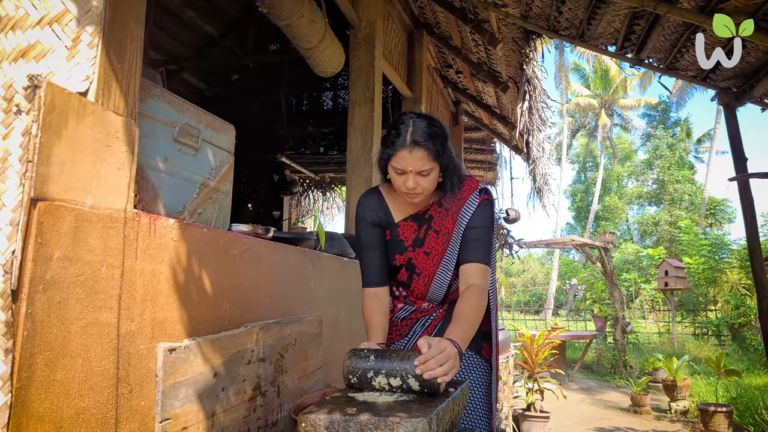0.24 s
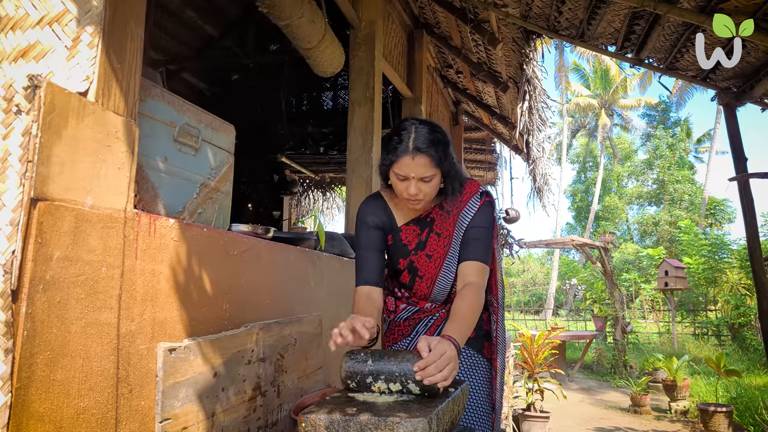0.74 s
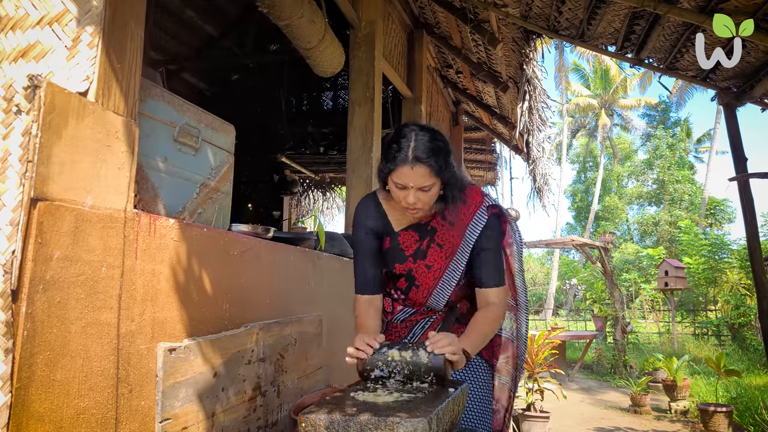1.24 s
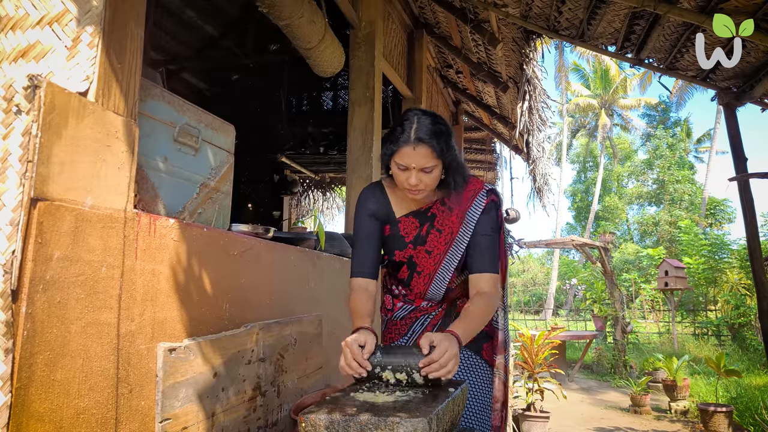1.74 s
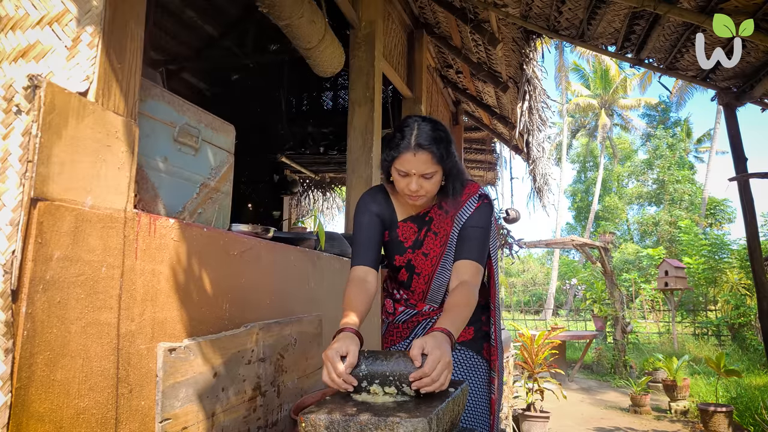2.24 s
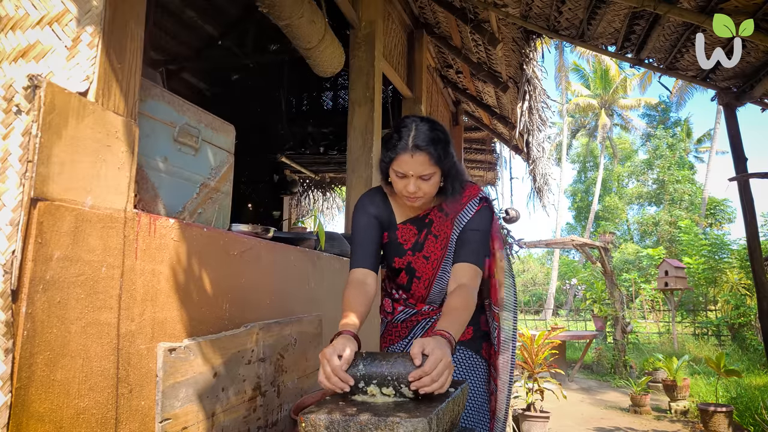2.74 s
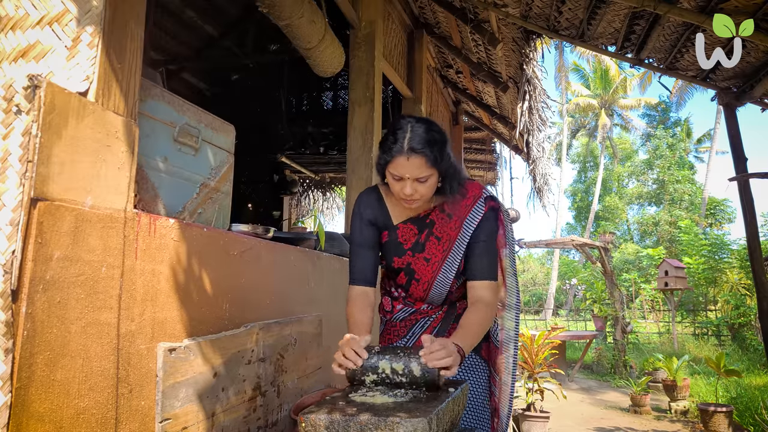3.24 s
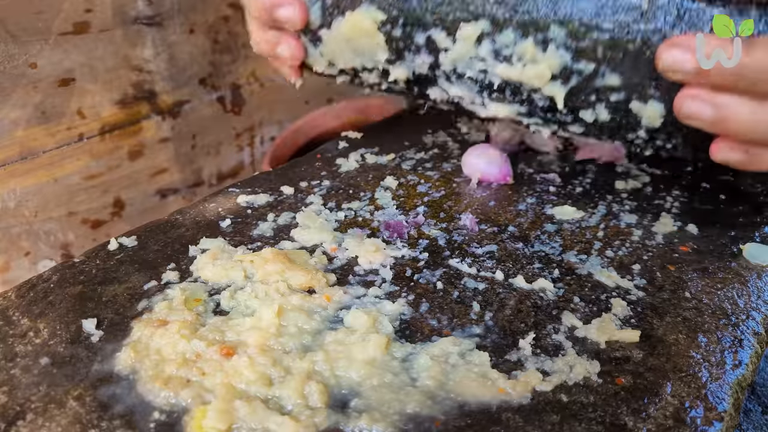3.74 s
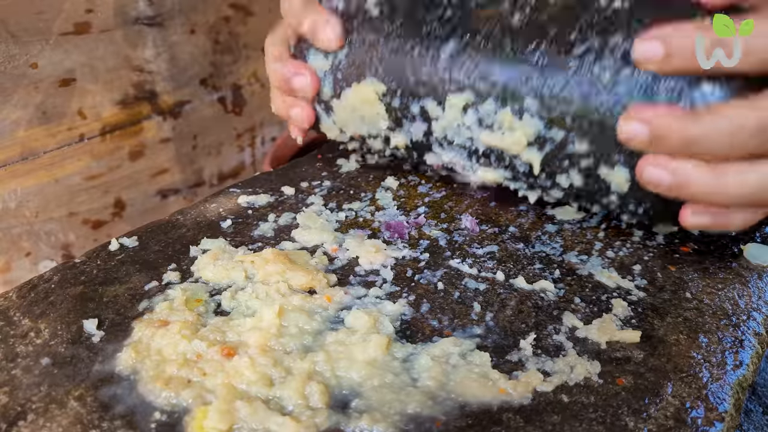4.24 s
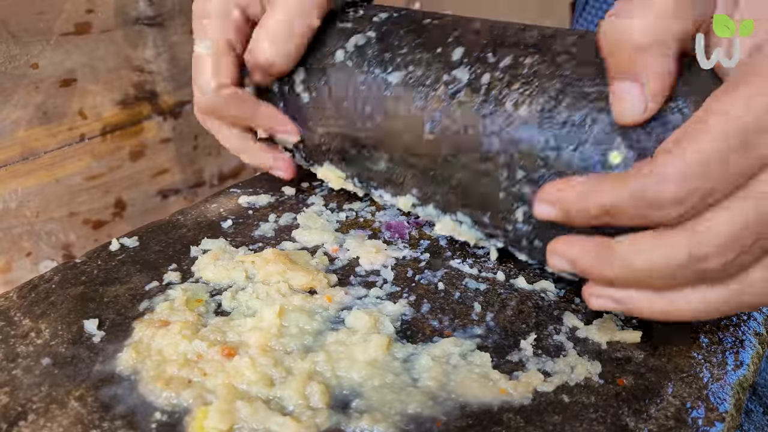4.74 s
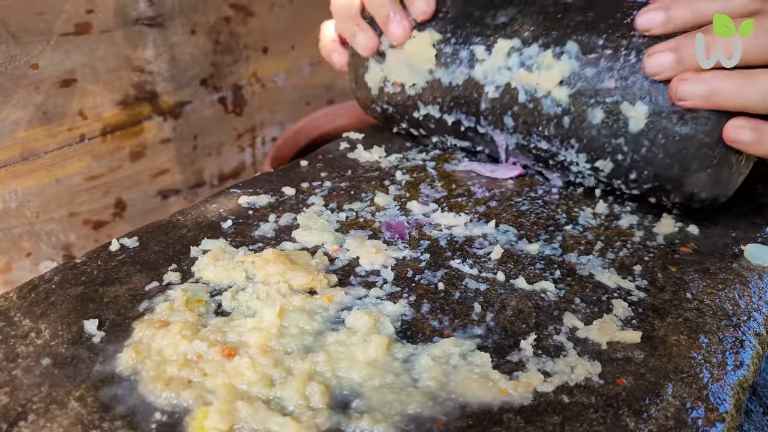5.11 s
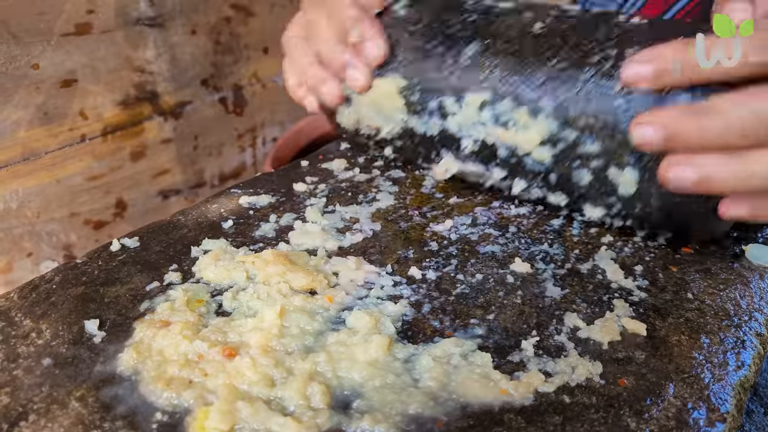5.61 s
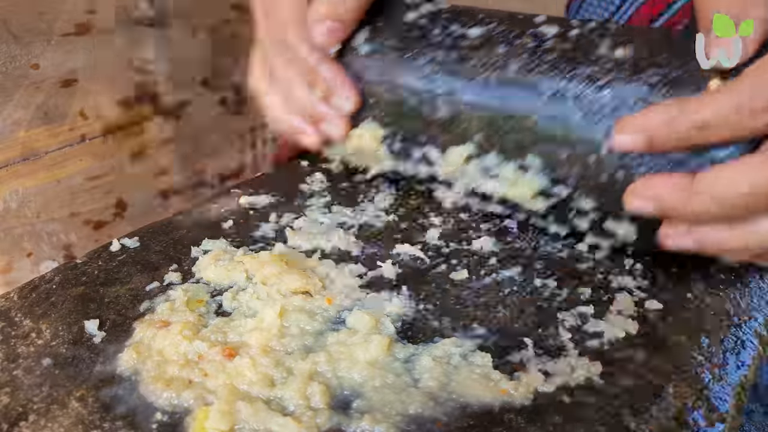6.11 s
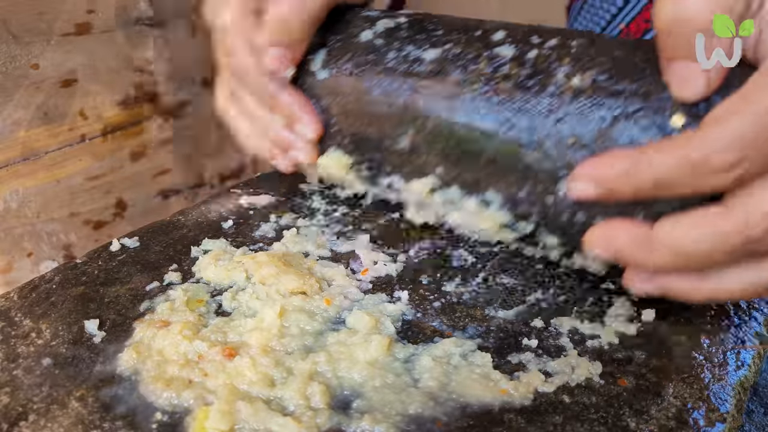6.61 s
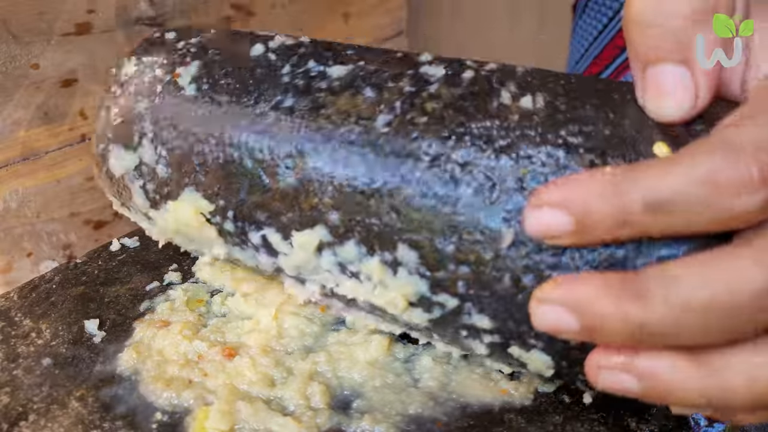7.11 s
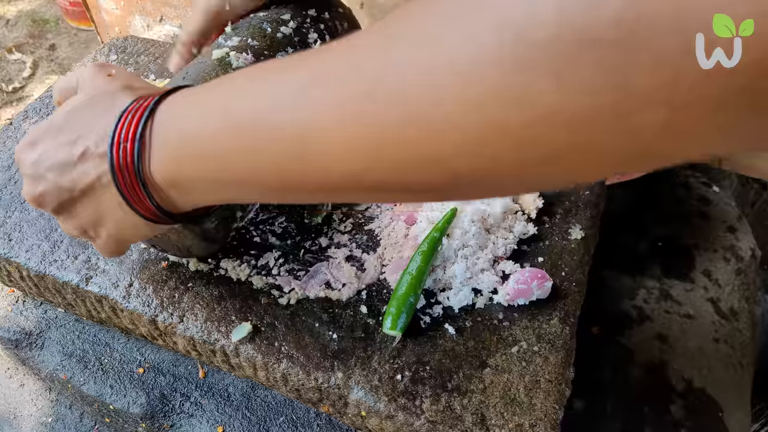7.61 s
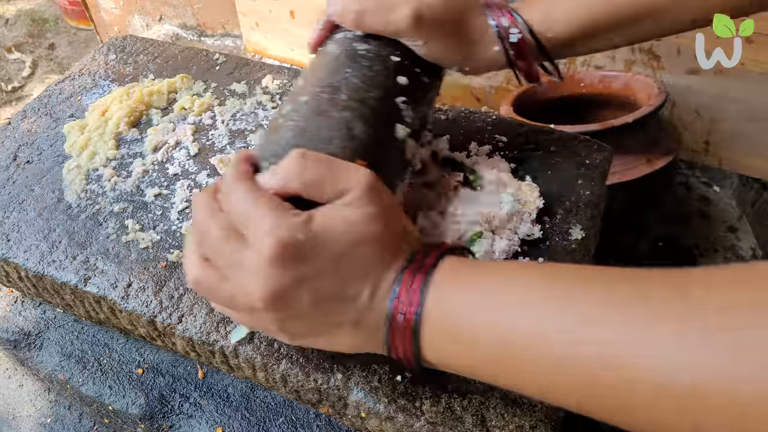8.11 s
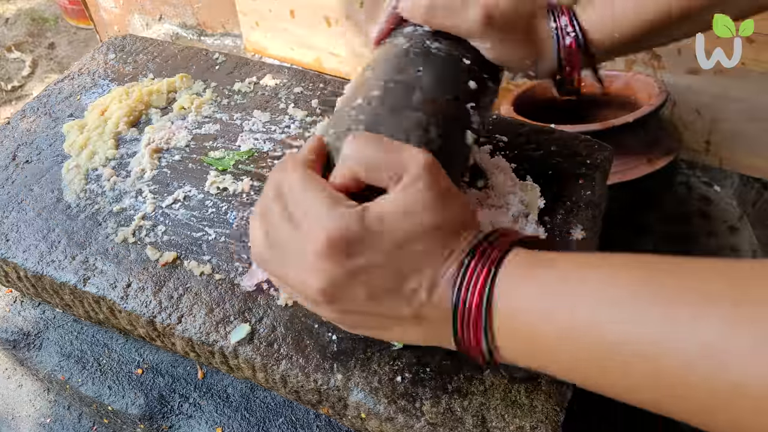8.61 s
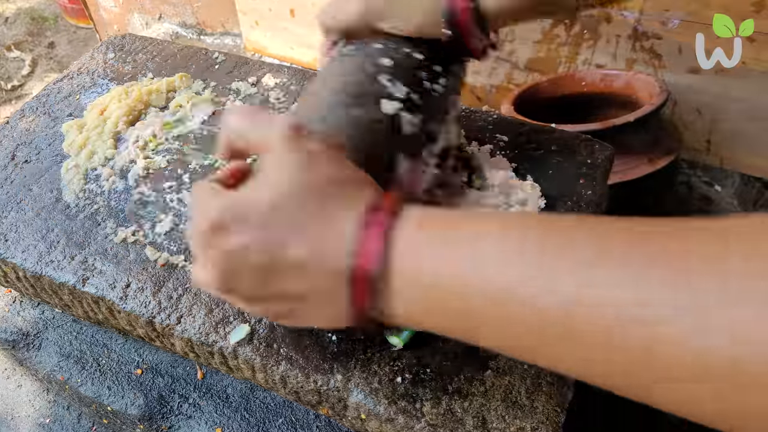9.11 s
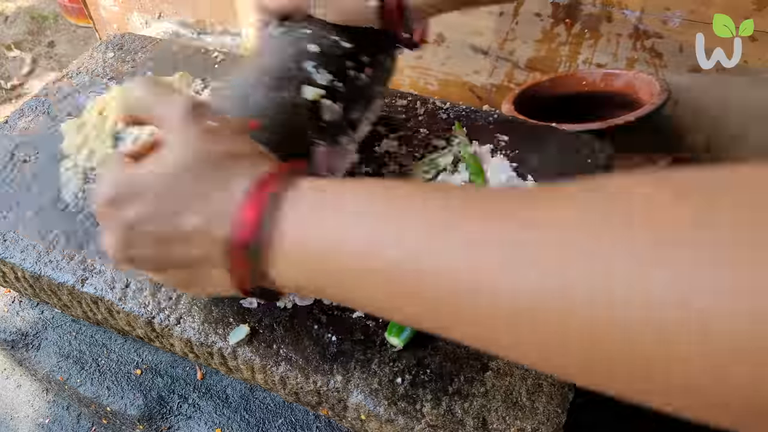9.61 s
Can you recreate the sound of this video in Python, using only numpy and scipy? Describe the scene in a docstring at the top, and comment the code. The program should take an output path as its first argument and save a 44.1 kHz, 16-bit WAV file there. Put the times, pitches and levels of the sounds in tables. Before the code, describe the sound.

Outdoors in a leafy garden, a stone roller works over a slab in short uneven strokes, soft and low at first with light bangle clinks. After a loud stony knock the grinding gets closer, grittier and wetter, with sharp snaps, a brief skid creak and brighter jingling. A bird repeats a hoot and four quick yelps toward the right, over faint insects.

```python
"""Stone roller on a grinding slab

Under a thatched eave a stone roller crushes shallots and paste: shaped noise and grains rumble and rasp.
Knocks ring slab modes, shallots snap and crackle, a skid creaks, bangles jingle in runs of modal contacts.
A bird, a gliding tone with overtones and hoarse noise, hoots and yelps in the garden to the right.
Narrow noise bands make the insects in the trees and far birds, over low outdoor air."""
import sys
import numpy as np
from scipy import signal
from scipy.fft import rfft, irfft, next_fast_len
from scipy.io import wavfile
from scipy.ndimage import uniform_filter1d

SR = 44100
rng = np.random.default_rng(int(sys.argv[2]) if len(sys.argv) > 2 else 0)


def materialize(psi):
    """Save the field psi as 16-bit PCM at rate SR to the path in sys.argv[1].

    A 1-D psi becomes a single channel; in a 2-D psi each row is a channel.
    """
    bounded = np.clip(np.atleast_2d(psi).T, -1, 1)
    quanta = np.round(bounded * 32767).astype(np.int16)
    wavfile.write(sys.argv[1], SR, quanta)


N = 434823
T = np.arange(N) / SR

# spectra list [f/Hz, relative density/dB]; levels are before the *_trim_db of the function that plays them
# roller strokes: [t/s, length/s, rumble level/dB, rasp level/dB, stand shudder level/dB]
ROLLER_STROKES = [(0.018, 0.094, -55, -61, -52.5), (.3, 0.15, -70, -62.5, -54),
                  (0.574, 0.2, -74, -85, -53.5), (0.853, 0.38, -67, -64.5, -51.5),
                  (1.278, 0.1, -66, -60, -54), (1.414, 0.15, -63, -86, -50.5),
                  (1.735, 0.39, -58.5, -66, -55), (2.26, 0.24, -59.5, -63, -52.5),
                  (2.665, 0.21, -60, -67, -51), (2.977, .19, -62.5, -65, -51.5),
                  (3.236, 0.2, -62.5, -62, -53.5), (3.578, 0.11, -65, -65.5, -49.5),
                  (3.838, 0.41, -76, -89, -50.5), (4.256, 0.15, -70, -66, -48.5),
                  (4.495, 0.11, -53, -91, -44.5), (4.733, 0.33, -72, -72.5, -53.5),
                  (5.097, 0.33, -61, -54, -50.5), (5.613, 0.083, -59.5, -53, -48.5),
                  (5.794, 0.12, -50.5, -51.5, -48.5), (6.032, 0.15, -66, -63, -68),
                  (6.155, 0.072, -53.5, -55.5, -48), (6.31, 0.16, -53.5, -55, -49.5),
                  (6.618, 0.167, -57, -57, -54), (6.838, 0.25, -52.5, -61.5, -54),
                  (7.247, 0.27, -79, -64, -63), (7.648, 0.31, -67, -68.5, -52),
                  (7.983, 0.38, -65, -52.5, -47), (8.225, 0.32, -57, -52.5, -47.5),
                  (8.583, 0.13, -64, -53, -45.5), (8.728, .22, -55, -50, -43.5),
                  (9.058, .14, -52, -51, -44.5), (9.293, 0.18, -53, -52.5, -46),
                  (9.605, 0.15, -58.5, -54.5, -48.5), (9.796, .1, -52.5, -62.5, -50.5)]
# slab bumped by pits: [f/Hz, relative density/dB]
RUMBLE_SPECTRUM = [(60, -12), (130, -3), (230, 1), (300, 4), (420, -11), (620, -14), (1000, -10),
                   (2500, -37.5)]
# grit cracking: [f/Hz, relative density/dB]
RASP_SPECTRUM = [(300, -6.5), (700, -5.5), (1200, 0.5), (2400, 2), (4500, 5), (7000, -1), (11000, -5.5),
                 (16000, -17.5)]
# wet paste tearing from the stone: [f/Hz, relative density/dB]
SQUELCH_SPECTRUM = [(2000, -25), (5000, -4), (8000, 3), (12000, 2), (16000, -5)]
# stand rocking: [f/Hz, relative density/dB]
SHUDDER_SPECTRUM = [(20, -39), (32, -14.5), (52, 2), (75, -1), (120, -5), (180, -17.5), (500, -45)]
# paste wetness: [t/s, crackle level re rasp/dB]
PASTE_WETNESS = [(0, -6), (4.5, -5), (5.1, 4), (7.1, 0), (7.3, -23), (9.86, -2)]
# roller creeping between strokes
CREEP_ROLL_DB, CREEP_GRIT_DB, CREEP_STAND_DB = -72, -76, -57
STROKE_RELEASE_S, STAND_RELEASE_S = 0.09, 0.35  # the stand rocks on longer


def grinding(rumble_trim_db=1, rasp_trim_db=1, stand_trim_db=-1):
    """Pits in the stone bump the slab and its stand; grit cracks and wet paste tears under the roller."""
    roll, grit, stand = amp([CREEP_ROLL_DB, CREEP_GRIT_DB, CREEP_STAND_DB])
    for start, length, roll_db, grit_db, shudder_db in ROLLER_STROKES:
        push = pressure(start, length, STROKE_RELEASE_S)
        rocking = pressure(start, length, STAND_RELEASE_S)
        roll = np.maximum(roll, amp(roll_db) * push)
        grit = np.maximum(grit, amp(grit_db) * push)
        stand = np.maximum(stand, amp(shudder_db) * rocking)

    bumps = colour(spread(grains(N, rate_hz=500, scatter_db=1.0), side=0.21), RUMBLE_SPECTRUM)
    rasp = colour(spread(grains(N, rate_hz=4500, scatter_db=2.0), side=0.83), RASP_SPECTRUM)
    rasp = rasp * amp(2.97 * walk(35))
    rasp = rasp * amp(1.4 * walk(180))  # grit keeps catching and letting go
    squelch = colour(spread(grains(N, rate_hz=3000, scatter_db=4.5), side=0.78), SQUELCH_SPECTRUM)
    wetness_db = np.interp(T, *np.transpose(PASTE_WETNESS))
    rasp = rasp + squelch * amp(wetness_db)
    shudder = colour(spread(rng.standard_normal((2, N)), side=0.21), SHUDDER_SPECTRUM)

    mix = amp(rumble_trim_db) * roll * bumps
    mix = mix + amp(rasp_trim_db) * grit * rasp
    mix = mix + amp(stand_trim_db) * stand * shudder
    return pan(0.5) * mix


def pressure(start, length, release_s, attack_s=0.03, easing_db_per_s=0.5):
    """One stroke: the hands bear down, hold while slowly easing, let go."""
    t = T - start
    rise = np.clip(t / attack_s + 0.5, 0, 1)
    fall = np.clip(1 - (t - length) / release_s, 0, 1) ** 2
    return rise * fall * amp(-easing_db_per_s * np.clip(t, 0, length))


# roller landings: [t/s, ring peak level/dB, strongest f/Hz, hardness slope/(dB/octave), left re right/dB]
ROLLER_KNOCKS = [(.049, -37, 376, -4, -1), (1.118, -45, 300, -5, 3), (1.895, -43, 355, -3.5, -3),
                 (2.769, -37.5, 349, -23, -1), (2.917, -38, 356, -13, 1), (3.092, -36.5, 402, -13, -2),
                 (3.228, -43.5, 400, -10, -1), (3.356, -33.5, 331, -4, 0), (4.493, -6, 188, 2, 3.5),
                 (4.516, -19.5, 179, -8, -2), (5.095, -28, 240, -15, 0), (5.382, -41, 152, -9, 4),
                 (5.9083, -21, 550, -5.5, 4.5), (5.914, -24.5, 252, -10, 0), (6.166, -30, 820, -13, 6),
                 (6.174, -30, 200, -16, 1), (6.447, -33, 396, -6.5, 5), (6.976, -32.5, 483, -8, 4),
                 (7.018, -31.5, 450, -3.5, 6), (9.451, -36.5, 71, -6, 18)]
# roller and slab modes: [nominal f/Hz, relative level/dB, t60/s]
STONE_MODES = [(64.5, 9.5, 0.22), (132.6, 6, 0.06), (191.3, 5, 0.05), (232.3, 2, 0.066), (264.4, -7, 0.12),
               (326, -13, 0.12), (461, -12, 0.069), (639, -6, 0.033), (850, -6.5, 0.048), (890, -18, 0.076),
               (1180, -13.5, 0.036), (1362, -16, 0.058), (1448, -29, 0.16), (1683, -28, 0.1),
               (1920, -17, 0.018), (2040, -18, 0.036), (2515, -20, 0.11), (2530, -22, 0.057),
               (2830, -35, 0.085)]


def knocks(click_db=7, click_hz=1500, click_t60_s=0.0023, grit_db=-13, grit_t60_s=0.098, rise_cycles=1.0):
    """Stone meets stone: a brief contact click, then the modes swell; paste between them dulls the blow."""
    out, t = np.zeros((2, N)), T[:SR // 2]
    grit_spectrum = [(100, -10), (2200, -8.0), (4000, -26.5), (16000, -25.5)]
    for s, peak_db, body_hz, slope_db_per_octave, pan_db in ROLLER_KNOCKS:
        ring = 0
        for hz, mode_db, t60_s in STONE_MODES:
            phase = rng.normal(0, 0.54, (2, 1)) + rng.uniform(0, 1.58)
            swell = 1 - np.exp(-t * hz / rise_cycles)  # low modes take longer to build
            detuned_hz = hz * (1 + 0.0038 * rng.standard_normal())
            mode = np.sin(2 * np.pi * detuned_hz * t + phase) * swell * fade(t, t60_s)
            # where the roller lands decides which modes take the blow
            octaves = np.log2(hz / body_hz)
            tilt_db = octaves * (slope_db_per_octave if octaves > 0 else 14)
            ring = ring + amp(mode_db + tilt_db) * mode
        grit = amp(grit_db) * colour(rng.standard_normal((2, len(t))), grit_spectrum) * fade(t, grit_t60_s)
        click = amp(click_db) * np.sin(2 * np.pi * click_hz * t) * fade(t, click_t60_s)
        bare_stone = amp(6.3 * min(slope_db_per_octave, 0))  # soft blows lose click and grit
        blow = ring / np.abs(ring).max() + bare_stone * (click + grit)
        add(out, s, blow * amp(peak_db) * pan(pan_db))
    return out


# roller skidding to a stop: [t/s, mean slip rate f/Hz, level/dB]
SKID_CREAK = [(6.975, 540, -65), (6.979, 520, -31), (6.988, 480, -38), (7.004, 450, -44), (7.02, 470, -29),
              (7.034, 490, -36), (7.055, 550, -42), (7.078, 620, -48), (7.1, 640, -68)]


def creak(jitter=0.082, flutter_db=3.0, second_db=-19, noise_db=-13.0):
    """Wet stone sticks and slips hundreds of times a second, unevenly."""
    s, hz, db = np.transpose(SKID_CREAK)
    slip_hz = np.interp(T, s, hz) * (1 + jitter * walk(400))
    phase = 2 * np.pi * np.cumsum(slip_hz) / SR
    slips = np.sin(phase) + amp(second_db) * np.sin(2 * phase)
    slips = slips + amp(noise_db) * band(rng.standard_normal(N), 720, 690)
    level = amp(np.interp(T, s, db) + flutter_db * walk(250))
    return pan(4.5) * slips * level * (T > s[0]) * (T < s[-1])


# shallots and fibres snapping: [t/s, peak level/dB]
SHALLOT_SNAPS = [(1.331, -34.5), (4.0227, -10.5), (4.2733, -19), (4.2861, -4.5), (5.0966, -38),
                 (5.3832, -25.5), (6.6014, -27.5), (8.1076, -30), (8.1341, -22), (8.159, -23), (8.589, -33),
                 (8.6494, -28), (8.7082, -22)]
# flesh giving way: [t/s, length/s, level/dB]
FLESH_CRUSHES = [(4.018, 0.01, -32.5), (4.271, 0.017, -26.5), (7.856, 0.07, -46.5), (8.084, 0.057, -47),
                 (8.133, 0.035, -35.5), (8.633, 0.027, -43.5), (8.701, 0.039, -40.5)]
# crushed cells: [f/Hz, relative density/dB]
CRUNCH_SPECTRUM = [(300, -24), (800, -1), (1400, 1), (2500, 5.5), (5000, -0.5), (8000, -0.5), (16000, -4.5)]


def crushing(snap_trim_db=3, snap_t60_s=0.0015, median_snap_hz=3000):
    """Skins split with sharp snaps and the flesh collapses in dense crackle."""
    out, t = np.zeros((2, N)), T[:SR // 4]
    for s, length, db in FLESH_CRUSHES:
        cells = colour(spread(grains(len(t), rate_hz=9000, scatter_db=2.0), side=0.76), CRUNCH_SPECTRUM)
        add(out, s, cells * burst(t, length, t60_s=0.051) * amp(db))
    for s, peak_db in SHALLOT_SNAPS:
        snap_hz = median_snap_hz * np.exp(0.58 * rng.standard_normal())
        snap = np.cos(2 * np.pi * snap_hz * t) * fade(t, snap_t60_s)
        add(out, s, snap * amp(peak_db + snap_trim_db))
    # such small things radiate no bass
    out = signal.sosfilt(signal.butter(2, 650, "high", fs=SR, output="sos"), out)
    return out + echoes(out, t60_s=0.13, wet_db=-17.5, delay_s=0.0024)


# bangles sliding together as the wrists turn:
# [t/s, rattle length/s, first contact peak level/dB, rattle rms level/dB, left re right/dB]
BANGLE_CLASHES = [(.027, 0.031, -20, -41.5, 1), (.405, 0.015, -22, -50, 2), (.525, 0.023, -23.5, -47, 1),
                  (0.9226, 0.074, -22, -39, 1.5), (1.27, .012, -21, -37, 3), (1.4727, 0.029, -26, -40, 2),
                  (1.5568, 0.057, -17.5, -39.5, 0), (2.135, 0.13, -29, -36, -1),
                  (2.7429, 0.064, -27, -33, 2), (3.379, 0.021, -30, -38, 1), (3.4088, 0.039, -21, -35.5, 0),
                  (3.8186, .015, -29, -45, 5), (4.782, .075, -30, -30, -1), (5.4085, 0.04, -25, -27.5, -4),
                  (5.4574, 0.03, -25, -21.5, 5), (5.81, .02, -20.5, -38, -4), (5.9434, 0.023, -17, -28, -6),
                  (5.9747, .045, -11.5, -29, -2.5), (6.351, .025, -16.5, -30, -4),
                  (6.4713, .065, -16, -30, 4), (6.6008, .015, -19, -38, 2), (6.8409, 0.031, -15, -31.5, -3),
                  (7.0425, .03, -16, -30.5, -3.5), (7.636, 0.016, -33, -30.5, 6),
                  (7.675, .035, -16, -35.5, 2), (8.053, 0.01, -22, -47, 0),
                  (8.3318, 0.053, -11, -30.5, 5.5), (8.7233, 0.021, -19, -28.5, 4),
                  (8.7869, .012, -30, -41, 8), (8.808, 0.014, -20, -39, 10), (8.8663, .015, -24, -31, 4),
                  (8.8973, .02, -9, -22.5, 5), (8.935, 0.036, -11, -22.5, 4.5), (9.021, 0.022, -10, -37, 0),
                  (9.217, .012, -11.5, -48, 1), (9.287, 0.07, -20, -33, 4),
                  (9.4535, 0.064, -21, -23.5, 4.5), (9.5418, 0.021, -15.5, -28, 4)]
# light touches during strokes; louder rasp, louder touches
TOUCHES_PER_S, TOUCH_DB, TOUCH_SCATTER_DB, TOUCH_DB_PER_RASP_DB = 8, -33.5, 7.5, 0.3


def bangles(first_trim_db=-1, rattle_trim_db=0.5, scatter_db=14, count=48):
    """Unlike rings: one sharp contact, then a quick run of rebounds; light random touches in strokes."""
    out = np.zeros((2, N))
    tinks = [tink(detune=0.028, tick_db=-1.5, tick_t60_s=0.043) for _ in range(count)]
    contacts = [x / np.abs(x).max() for x in tinks]
    for s, length, peak_db, rms_db, pan_db in BANGLE_CLASHES:
        first = contacts[rng.integers(count)]
        add(out, s, first * amp(peak_db + first_trim_db) * pan(pan_db))
        run = rattle(tinks, length, scatter_db)
        add(out, s, run * amp(rms_db + rattle_trim_db) * pan(pan_db))

    usual_rasp_db = np.mean(ROLLER_STROKES, axis=0)[3]
    chances = rng.random((len(ROLLER_STROKES), 6, 3))  # up to six touches a stroke
    for (start, length, _, rasp_db, _), chance in zip(ROLLER_STROKES, chances):
        db = TOUCH_DB + TOUCH_DB_PER_RASP_DB * (rasp_db - usual_rasp_db)
        for k, (late, size, which) in enumerate(chance):
            after = (k + late) / TOUCHES_PER_S
            if after < length + STROKE_RELEASE_S:
                touch_db = db + TOUCH_SCATTER_DB * (2 * size - 0.5)
                add(out, start + after, contacts[int(which * count)] * amp(touch_db))
    return out + echoes(out, t60_s=0.24, wet_db=-18.5, delay_s=0.00308)


def rattle(tinks, length, scatter_db, rebounds_per_s=230, sag_db=3):
    """A run of uneven rebounds that tend to weaken; rms 1 over its length."""
    out = np.zeros((2, SR // 3))
    count = int(np.clip(length * rebounds_per_s, 3, 60))
    for k, (late, size, which) in enumerate(rng.random((60, 3))[:count]):
        along = (k + late) / count
        rebound = tinks[int(which * len(tinks))]
        add(out, along * length, amp(scatter_db * size - sag_db * along) * rebound)
    return out / out[:, :int(length * SR)].std()


# bangle modes: [nominal f/Hz, mean relative level/dB, t60/s]
BANGLE_MODES = [(1960, -29.5, 0.22), (3917, -15, 0.078), (4490, -13, 0.12), (5380, -10, 0.082),
                (5770, -17.5, 0.194), (8030, -6.5, 0.071), (8720, -7, 0.12), (9250, -17, 0.033),
                (10350, 6, 0.063), (10940, 4, 0.074), (12030, -1, 0.04), (12800, 0, 0.031),
                (13350, 4.5, 0.049), (14600, 1, 0.03), (13840, 9.5, 0.091)]


def tink(detune, tick_db, tick_t60_s):
    """One contact between two bangles; where they touch decides which modes speak."""
    t = T[:SR // 8]
    hz, db, t60_s = np.transpose(BANGLE_MODES)[:, :, None]
    hz = hz * (1 + detune * rng.standard_normal(hz.shape))
    modes = np.exp((2j * np.pi * hz - np.log(1000) / t60_s) * t)
    level = amp(db.T + 6.2 * rng.standard_normal(len(hz)))
    # complex weights give each mode a random phase per ear
    weights = level * (rng.standard_normal((2, len(hz))) + 1j * rng.standard_normal((2, len(hz))))
    ring = (weights @ modes).imag / np.linalg.norm(weights, axis=1, keepdims=True)
    tick_spectrum = [(2000, -54), (4500, -8.5), (7000, -4), (10000, 1.5), (16000, 9)]
    tick = colour(rng.standard_normal((2, len(t))), tick_spectrum)
    return ring + amp(tick_db) * tick * fade(t, tick_t60_s)


# calls: [t of opening hoot/s, level/dB]
CALLS = [(-.01, -32), (.853, -34), (1.706, -34.5), (2.602, -34.5), (3.393, -34), (4.24, -34),
         (5.038, -32.5), (5.818, -33.5), (6.62, -34), (7.456, -33), (8.352, -33.5), (9.161, -34.5)]
# opening hoot: [t from its peak/s, mean f/Hz, relative level/dB]
HOOT_ARCH = [(-.055, 920, -32), (-.025, 1010, -14), (-.005, 1085, -1), (.008, 1070, -1), (.028, 975, -18),
             (.065, 1030, -21)]
# yelps of each call: [t after hoot/s, top f/Hz, relative level/dB]
CALL_YELPS = [(0.094, 1154, -2), (0.132, 1208, -0.5), (0.175, 1188, -2), (0.224, 1171, -7.5)]
# one yelp: [t from its peak/s, share of top f, relative level/dB]
YELP_ARCH = [(-.014, .96, -19), (-.006, 1, -3), (.003, .965, 0), (.011, .92, -5), (.018, .89, -17)]


def bird(trim_db=-1, second_db=-25, third_db=-39, croak_db=-25):
    """One nearly pure arched hoot runs into four quick, hoarser yelps that echo through the trees."""
    voice = np.zeros(N)
    jitter = 0.005 * walk(150) + 0.006 * walk(700)
    flutter = amp(2.5 * walk(90))
    croak_spectrum = [(800, -18.5), (1400, -3.5), (1700, -1.5), (2300, -7), (3200, -11.0), (5000, -43.5)]
    croak = colour(rng.standard_normal(N), croak_spectrum)
    for hoot_s, db in CALLS:
        yelps = [hoot_s + after for after, _, _ in CALL_YELPS]
        points = [(hoot_s + dt, hz, note_db) for dt, hz, note_db in HOOT_ARCH]
        for s, (_, top_hz, top_db) in zip(yelps, CALL_YELPS):
            points += [(s + dt, top_hz * share, top_db + note_db) for dt, share, note_db in YELP_ARCH]
        points.append((yelps[-1] + 0.06, 940, -28))
        s, hz, note_db = np.transpose(sorted(points))
        on = (T > s[0]) & (T < s[-1])
        t = T[on]
        pitch_hz = np.interp(t, s, hz) * (1 + jitter[on])
        phase = 2 * np.pi * np.cumsum(pitch_hz) / SR
        effort = amp(np.interp(t, s, note_db))
        overtones = amp(second_db) * np.sin(2 * phase) + amp(third_db) * np.sin(3 * phase)
        overtones = overtones * flutter[on]
        hoarse = amp(croak_db) * croak[on] * (t > yelps[0])
        # the throat swells the fundamental at the top of each arch more than the overtones
        call = effort * np.sin(phase) + np.sqrt(effort) * (overtones + hoarse)
        voice[on] += amp(db + trim_db) * call
    near = echoes(voice, t60_s=0.21, wet_db=-5, delay_s=0.006)
    far = echoes(voice, t60_s=0.96, wet_db=-4, delay_s=0.028)
    return pan(-16.0) * voice + pan(-0.5) * (near + far)


# outdoor air: [f/Hz, relative density/dB]
AIR_SPECTRUM = [(25, -30), (55, -15), (110, -12), (200, -17.5), (450, -20), (800, -25), (1100, -15.5),
                (2000, -22), (3300, -24.5), (7000, -25.5), (10500, -22), (16000, -27.5)]
# insects: [f/Hz, width of one filter pass/Hz, mean level/dB, flutter/dB]
INSECT_CHORUS = [(8973, 990, -50, 1), (4516, 860, -59.5, 1), (5466, 910, -62, 2.5)]
# distant birds, blurred by the trees: [t/s, length/s, f/Hz, width of one filter pass/Hz, level before fades/dB]
DISTANT_BIRDS = [(-.1, 0.29, 2580, 139, -45), (0, 0.15, 1500, 400, -55), (0.03, 0.37, 2520, 845, -52.5),
                 (.66, .1, 1660, 250, -61), (2.333, 0.3, 2900, 1300, -57), (7.197, 0.2, 2820, 500, -58),
                 (4, 0.25, 697, 63, -65.5), (9.579, 0.27, 1207, 170, -47)]


def garden(air_db=-59):
    """Low outdoor air, a fluttering insect chorus and far-off birds, all shaped noise."""
    air = colour(rng.standard_normal((2, N)), AIR_SPECTRUM)
    out = amp(air_db) * air * amp(0.37 * walk(1.3))
    for hz, width_hz, db, flutter_db in INSECT_CHORUS:
        shrill = band(rng.standard_normal((2, N)), hz, width_hz)
        out += shrill * amp(db + flutter_db * walk(110) + 0.94 * walk(4.12))
    for s, length, hz, width_hz, db in DISTANT_BIRDS:
        n = int(length * SR)
        chirp = band(rng.standard_normal((2, n)), hz, width_hz)
        add(out, s, chirp * np.sqrt(np.hanning(n)) * amp(db))
    return out


def echoes(x, t60_s, wet_db, delay_s):
    """Scattered reflections, different at each ear."""
    t = T[:SR]
    tail = rng.standard_normal((2, SR)) * fade(t, t60_s) * (t > delay_s)
    tail /= np.sqrt(np.sum(tail ** 2, axis=1, keepdims=True))
    return amp(wet_db) * signal.fftconvolve(np.atleast_2d(x), tail, axes=1)[:, :N]


def grains(n, rate_hz, scatter_db):
    """Two streams of tiny random fractures, a few much larger than the rest."""
    size = amp(scatter_db * np.minimum(rng.exponential(size=(2, n)), 5))
    return (rng.random((2, n)) < rate_hz / SR) * size * rng.standard_normal((2, n))


def spread(x, side):
    """Two unrelated signals as middle and side of a stereo pair."""
    return x[0] + side * x[1] * np.array([[1], [-1]])


def colour(x, spectrum):
    """Filter by (Hz, dB) points; rms 1."""
    hz, db = np.transpose(spectrum)
    n = next_fast_len(x.shape[-1], True)
    f = np.arange(n // 2 + 1) * SR / n
    gain = amp(np.interp(np.log(f + 1), np.log(hz), db))
    return unit(irfft(rfft(x, n) * gain, n)[..., :x.shape[-1]])


def band(x, hz, width_hz):
    """A resonance applied twice, for steep skirts; rms 1."""
    b, a = signal.iirpeak(hz, hz / width_hz, fs=SR)
    return unit(signal.lfilter(b, a, signal.lfilter(b, a, x)))


def walk(rate_hz):
    """Smooth random drift, rms 1."""
    k = max(int(SR / rate_hz), 1)
    steps = np.repeat(rng.standard_normal(N // k + 1), k)
    return unit(uniform_filter1d(steps, k)[:N])


def fade(t, t60_s):
    """Exponential decay, 60 dB in t60_s."""
    return np.exp(-np.log(1000) * t / max(t60_s, 1e-3))


def burst(t, length, t60_s):
    """A quick rise, a hold and a decay."""
    return np.minimum(t / 0.00099, 1) * fade(np.maximum(t - length, 0), t60_s)


def amp(db):
    """Decibels to gain."""
    return 10 ** (np.asarray(db) / 20)


def unit(x):
    """Scale to rms 1."""
    return x / np.sqrt(np.mean(x ** 2))


def pan(db):
    """Left and right gains for a left re right level difference."""
    return amp(np.array([[db], [-db]]) / 2)


def add(out, s, x):
    """Mix x into out from time s."""
    i = int(s * SR)
    x, i = x[..., max(-i, 0):], max(i, 0)
    out[..., i:i + x.shape[-1]] += x[..., :max(N - i, 0)]


def scene():
    """The grinding stone under the eave, with the garden beyond."""
    stone = knocks() + creak()
    stone_echo = echoes(stone, t60_s=0.26, wet_db=-24.0, delay_s=0.011)
    return grinding() + stone + stone_echo + crushing() + bangles() + bird() + garden()


def record(dry, top_hz=15800):
    """Steep low-pass: the treble ends at top_hz."""
    return signal.sosfilt(signal.ellip(10, 0.2, 70, top_hz, fs=SR, output="sos"), dry)


dry = scene()
out = record(dry)
materialize(out)
```